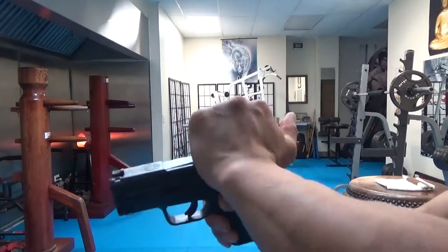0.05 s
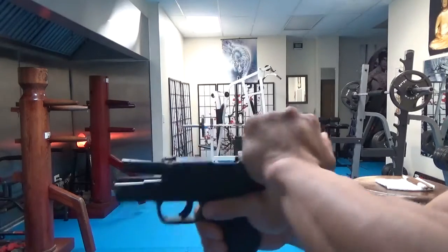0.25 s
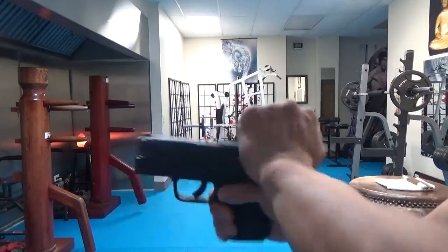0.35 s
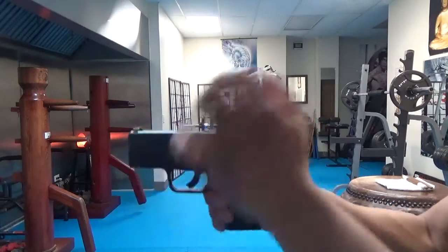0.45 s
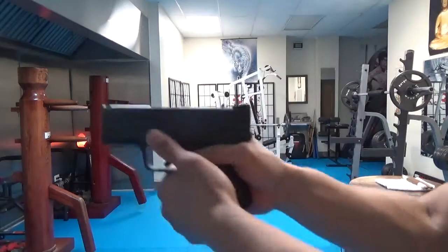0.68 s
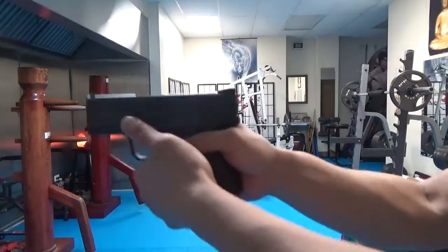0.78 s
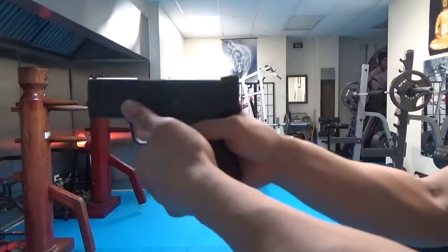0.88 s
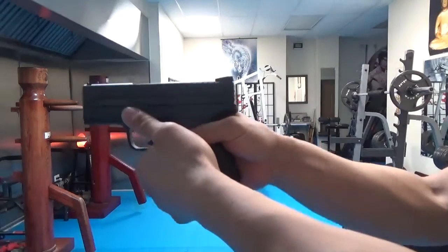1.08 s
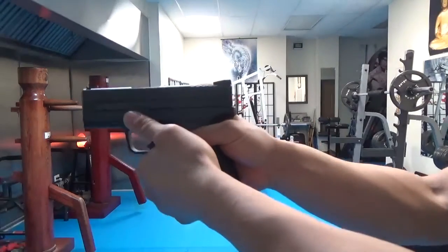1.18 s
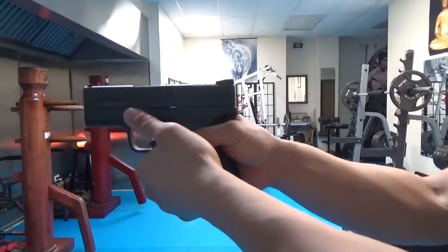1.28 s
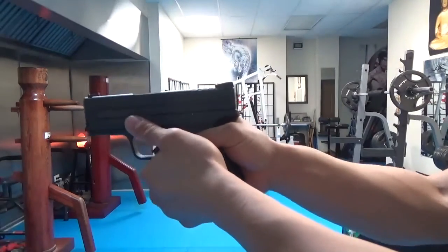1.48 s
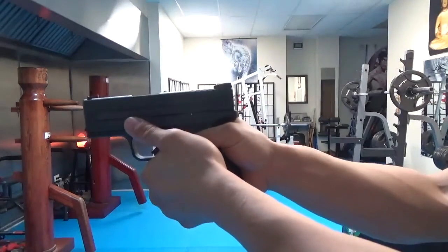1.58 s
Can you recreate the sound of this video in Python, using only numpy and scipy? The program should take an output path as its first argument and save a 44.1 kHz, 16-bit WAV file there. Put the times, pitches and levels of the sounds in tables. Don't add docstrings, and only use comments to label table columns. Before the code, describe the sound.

A pistol slide is racked by hand, two bursts of loud sharp metal clacks indoors

```python
import sys
import numpy as np
from scipy import signal
from scipy.fft import rfft, irfft
from scipy.io import wavfile
from scipy.ndimage import uniform_filter1d

SR = 44100
rng = np.random.default_rng(int(sys.argv[2]) if len(sys.argv) > 2 else 0)


def store_wav(level_fs):
    pcm = np.round(np.clip(np.atleast_2d(level_fs), -1, 1) * 32767)
    wavfile.write(sys.argv[1], SR, pcm.T.astype(np.int16))


def invert_db(x):
    u = np.asarray(x, float) / 20
    return 10 ** u


N = 72765
T = np.arange(N) / SR

# f/Hz, density/dB per Hz
AIR_SPECTRUM = [(25, -16), (65, -8.5), (100, -9), (250, 1), (450, -1.5), (1000, -5), (3000, -12),
                (10000, -16)]
# f/Hz, level/dB
AIR_SIDE = [(60, -24), (110, -17), (190, -15.5), (350, -9), (630, -3), (1130, -2), (2030, -2), (3640, -3.5),
            (6550, -7.5), (11800, -9.5)]
# f/Hz, level/dB
HUM_LINES = [(290.7, -83), (339.1, -76), (419.9, -71.5), (479.1, -75), (602.9, -79.5), (775.2, -82),
             (1195, -82)]
RUSTLE_T_S = (.075, .09, .105, .13)
# f/Hz, level/dB, t60/s
ROOM_BANDS = [(301, 2.5, 0.34), (671, 0.5, 0.39), (1500, -2, 0.37), (3240, 2.5, 0.45), (5160, -1, 0.32),
              (7450, -2.5, 0.29), (10350, 7, 0.2)]
# f/Hz, level/dB
ROOM_SIDE = [(300, -13), (1000, -5), (4000, -8), (9000, -9.5)]
# f/Hz, level/dB
MIC = [(80, -58), (300, -32.5), (700, -5.5), (2500, 2), (5000, 0), (7500, 1.5), (9500, 0)]
# t/s, level/dB, f/Hz, fade/cycles
JOLTS = [
    (.26, -54, 80, .7),
    (.268, -55, 200, 1.2),
    (.296, -52, 200, 1.2),
    (.412, -57, 250, 1.2),
    (.435, -49, 230, 1.5),
]
# t/s, level/dB, f/Hz, fade/cycles
THUMPS = [
    (0.2234, -25.5, 1500, 4.1),
    (.2975, -31.5, 900, 10),
    (.4375, -34, 612, 3.4),
    (.4425, -27.5, 1190, 3.05),
]
SPRING_T_S = (.2525, .256, .286, .2885)
# f/Hz, level/dB, t60/s
STEEL_MODES = [(900, -15, .015), (1600, -5.5, 0.013), (2346, -9.5, 0.03), (2690, -8.5, 0.008),
               (3300, -8, 0.0071), (4140, -5, 0.036), (4487, -0.5, 0.01), (5000, -3, .015),
               (7280, -6, 0.0073), (8360, 1.5, 0.0034), (9090, 6, 0.02), (10130, 5, .012),
               (10480, -17, 0.024)]
# t/s, peak level/dB, ring f/Hz, rattle length/s
SETTLE = [(.792, -49, 4300, .002), (.803, -48, 4500, .0015), (.838, -47, 10600, .014),
          (.835, -56, 3000, .03), (.979, -58, 1800, .002), (.98, -57, 3000, .002), (1.046, -49, 1400, .003),
          (1.047, -53, 2500, .003), (1.271, -53, 1900, .003), (1.317, -59, 2750, .005),
          (1.384, -56, 2750, .005), (1.516, -55, 2750, .006), (1.583, -56, 2750, .005)]
# t/s, peak level as heard/dB, main ring f/Hz, rattle length/s
PULL = [(.2284, -18, 3300, .0025), (.2318, -18, 3000, .0015), (.2358, -6, 4500, .0015),
        (.2443, -7, 4200, .0045), (.2519, -8, 10300, .0012), (.2648, -8, 2900, .0025),
        (.2749, -8, 9240, .004), (.2802, -10.5, 9250, .003), (.2902, -4.5, 6400, .0022),
        (.2975, -6.5, 4700, .0025), (.3025, -14, 4800, .003)]
# t/s, peak level as heard/dB, main ring f/Hz, rattle length/s
LET_GO = [
    (.3879, -8, 1600, .002),
    (.3976, -7, 4990, .004),
    (.4044, -8, 5000, .002),
    (.4135, -13, 9500, .002),
    (.4158, -7.5, 10500, .0015),
    (.4247, -8.5, 10500, .003),
    (.4295, -17, 3000, .002),
    (.4339, -13, 8000, .0008),
    (.4369, -4, 9940, .0038),
    (.4423, -6, 10300, .0038),
]
PULL_DUCK_DB = [1, 2, 7.1, 25.9, 10, 21, 25.2, 4.9, 25, 22, 17]
LET_GO_DUCK_DB = [12.4, 24.93, 12.3, 19, 16.9, 14.8, 10.1, 23, 21.63, 19]

AIR_DB = -57.5
RUSTLE_DB, RUSTLE_HZ = -63, 9500
TICK_DB, TICK_WAVER_DB, TICK_HZ = -62.5, 1.2, 3243
FRAME_S, TICK_START_S, TICK_LENGTH_S = 1.001 / 30, .012, .013
ROOM_DB, ROOM_BUILD_S, FIRST_ECHO_S = -10, .012, .004
LOOK_AHEAD_S, RELEASE_S = .0015, .045
SLOW_DUCK_DB, SLOW_RELEASE_S = 3, 2.1
SPRING_DB, SPRING_SEND_DB, SPRING_WAVER = -18.5, -9, .45
SPRING_HZ, SPRING_WIDTH_HZ = 9508, 45
STEEL_DB, SCATTER_DB, CRACK_DB, NEAR_DB = -1, 3, -2, 1.5
RING_DB, SETTLE_RING_DB, RING_Q, FULL_RING_HZ = 2, 22, 5, 4000
RATTLE_FADE, RATTLE_STOP_S, SNAP, SNAP_S = 1.5, .0006, .8, .00025
SEND_RING_DB, SEND_RING_Q, SEND_STEEL_DB = 0, 2.6, -2.5
KNOCK_SAMPLES, LEAD_SAMPLES = 4096, 512
LOW_CUT_HZ, TOP_HZ = 340, 11060
NOTCH_HZ, NOTCH_WIDTH_HZ, NOTCH_SHARE = 6250, 1100, .65


def along(table, hz, col=1):
    table = np.array(table)
    return np.interp(np.log(np.maximum(hz, 1.)), np.log(table[:, 0]), table[:, col])


def colour(x, table):
    n = x.shape[-1]
    hz = np.arange(n // 2 + 1) * SR / n
    return irfft(rfft(x) * invert_db(along(table, hz)), n)


def unit(x):
    return x / np.sqrt(np.mean(x ** 2))


def reso(x, hz, width_hz):
    return signal.lfilter(*signal.iirpeak(min(hz, .45 * SR), hz / width_hz, fs=SR), x)


def walk(rate_hz):
    k = int(SR / rate_hz)
    steps = np.repeat(rng.standard_normal(N // k + 1), k)
    return 1.17 * uniform_filter1d(uniform_filter1d(steps, k), k)[:N]


def ventilation():
    mid, side = colour(rng.standard_normal((2, N)), AIR_SPECTRUM)
    low = reso(mid, 300, 600) * (invert_db(2.0 * walk(25)) - 1)
    noise = unit(mid + low) * invert_db(AIR_DB)
    side = colour(side, AIR_SIDE) / np.std(mid) * invert_db(AIR_DB)
    return noise + side * np.array([[1], [-1]])


def mains_hum():
    hum = 0
    for hz, db in HUM_LINES:
        level = invert_db(db + 6.5 + 2.0 * walk(6.5))
        cycles = hz * T + 0.0838 * walk(3.2) + rng.random()
        hum = hum + level * np.sin(2 * np.pi * cycles)
    return hum


def frame_tick():
    age = (T - TICK_START_S) % FRAME_S / TICK_LENGTH_S
    level = invert_db(TICK_DB + TICK_WAVER_DB * walk(30))
    return level * np.sin(2 * np.pi * TICK_HZ * T) * np.sin(np.pi * np.minimum(age, 1))


def rustle():
    rub = unit(reso(rng.standard_normal(N), RUSTLE_HZ, 3000))
    return invert_db(RUSTLE_DB) * rub * np.interp(T, RUSTLE_T_S, [0, 1, 1, 0])


def room(x):
    mid, side = 0, 0
    build = 1 - np.exp(-np.maximum(T - FIRST_ECHO_S, 0) / ROOM_BUILD_S)
    for hz in 200 * 2 ** np.arange(0, 6, 1 / 3):
        fade = invert_db(along(ROOM_BANDS, hz) - 60 * T / along(ROOM_BANDS, hz, col=2)) * build
        band = reso(rng.standard_normal((2, N)), hz, hz / 4) * fade
        mid = mid + band[0]
        side = side + band[1] * invert_db(along(ROOM_SIDE, hz))
    scale = invert_db(ROOM_DB) / np.sqrt(np.sum(mid ** 2))
    echoes = scale * np.array([mid + side, mid - side])
    return signal.fftconvolve(x[None], echoes, axes=1)[:, :N]


def duck_db():
    dips = []
    for (s, _, _, length_s), depth_db in zip(PULL + LET_GO, PULL_DUCK_DB + LET_GO_DUCK_DB):
        dip = np.clip((T - s) / LOOK_AHEAD_S + 1, 0, 1)
        dips.append(depth_db * dip * np.exp(-np.maximum(T - s - length_s, 0) / RELEASE_S))
    first_s, last_s = PULL[0][0], LET_GO[-1][0]
    slow = SLOW_DUCK_DB * np.clip((T - first_s) / (last_s - first_s), 0, 1)
    slow = slow * np.exp(-np.maximum(T - last_s, 0) / SLOW_RELEASE_S)
    return np.max(dips, axis=0) + slow


def thumps(rows):
    out = 0
    for s, db, hz, cycles in rows:
        fade = (T > s) * np.exp(-np.maximum(T - s, 0) * hz / cycles)
        out = out + invert_db(db) * np.sin(2 * np.pi * hz * (T - s)) * fade
    return out


def spring():
    rub = unit(reso(rng.standard_normal(N), SPRING_HZ, SPRING_WIDTH_HZ))
    tone = np.sin(2 * np.pi * SPRING_HZ * T) + SPRING_WAVER * rub
    level = invert_db(SPRING_DB + np.array([[0], [SPRING_SEND_DB]]))
    return level * tone * np.interp(T, SPRING_T_S, [0, 1, 1, 0])


def rattle(t, length_s):
    chance = rng.standard_normal((2, len(t)))
    stop = np.clip((length_s + RATTLE_STOP_S - t) / RATTLE_STOP_S, 0, 1)
    shape = np.exp(-t / (RATTLE_FADE * length_s)) * stop + SNAP * np.exp(-t / SNAP_S)
    return shape * chance[0] * invert_db(3 * chance[1])


def steel(push):
    out = 0
    for (hz, db, t60_s), (a, b) in zip(STEEL_MODES, rng.standard_normal((len(STEEL_MODES), 2))):
        out = out + invert_db(db + SCATTER_DB * a) * unit(reso(push, hz * (1 + 0.012 * b), 2.12 / t60_s))
    return unit(out)


def knocks(rows, ring_db):
    out = np.zeros((2, N + KNOCK_SAMPLES))
    t = np.arange(KNOCK_SAMPLES) / SR
    edge = signal.windows.tukey(KNOCK_SAMPLES, .2)
    click = 1. * (np.arange(KNOCK_SAMPLES) == LEAD_SAMPLES)
    for s, db, hz, length_s in rows:
        push = rattle(t, length_s)
        ring = invert_db(ring_db) * min(hz / FULL_RING_HZ, 1) * unit(reso(push, hz, hz / RING_Q))
        hit = invert_db(STEEL_DB) * steel(push) + ring + invert_db(CRACK_DB) * unit(push)
        hit = colour(np.roll(hit, LEAD_SAMPLES), MIC) * edge
        hit = hit * invert_db(db) / np.max(np.abs(hit))
        smooth = unit(click) + invert_db(SEND_RING_DB) * unit(reso(click, hz, hz / SEND_RING_Q))
        smooth = unit(colour(smooth, MIC))
        send = np.std(hit) * smooth * edge + invert_db(SEND_STEEL_DB) * hit
        i = int(s * SR) - LEAD_SAMPLES
        out[:, i:i + KNOCK_SAMPLES] += [invert_db(NEAR_DB) * hit, send]
    return out[:, :N]


def scene():
    parts = knocks(PULL + LET_GO, RING_DB) + knocks(SETTLE, SETTLE_RING_DB) + spring() + thumps(THUMPS)
    parts = signal.sosfilt(signal.butter(4, LOW_CUT_HZ, "high", fs=SR, output="sos"), parts)
    true_level = invert_db(duck_db())
    gun, send = parts * true_level
    pan = invert_db(np.array([[.2], [-.2]]))
    heard = (gun + thumps(JOLTS) * true_level) * pan + room(send)
    heard = heard - NOTCH_SHARE * reso(heard, NOTCH_HZ, NOTCH_WIDTH_HZ)
    return heard + ventilation() + mains_hum() + frame_tick() + rustle()


def roll_off(x):
    return signal.sosfilt(signal.butter(12, 12380, fs=SR, output="sos"), x)


def record(dry):
    top_cut = signal.ellip(10, .3, 75, TOP_HZ, fs=SR, output="sos")
    mix = signal.sosfilt(top_cut, dry) * invert_db(-duck_db())
    return roll_off(mix)


dry = scene()
out = record(dry)
store_wav(out)
```